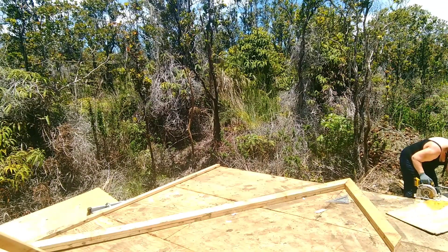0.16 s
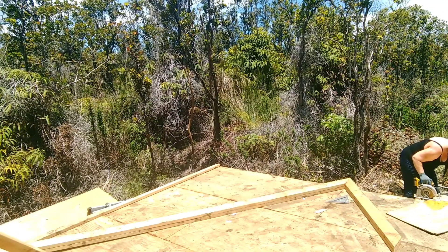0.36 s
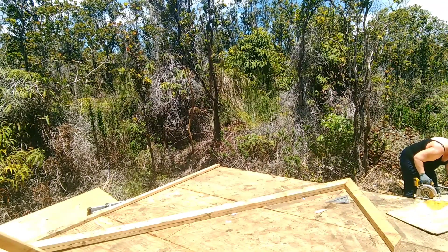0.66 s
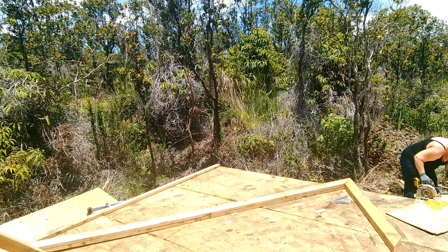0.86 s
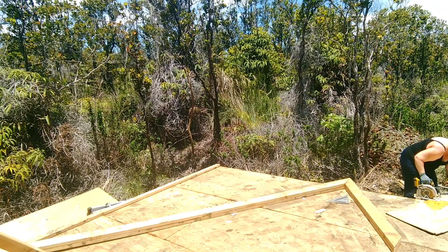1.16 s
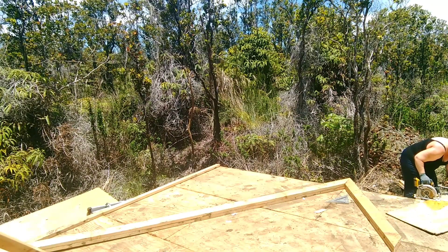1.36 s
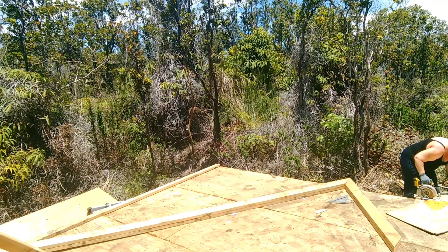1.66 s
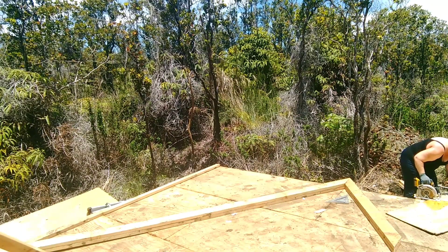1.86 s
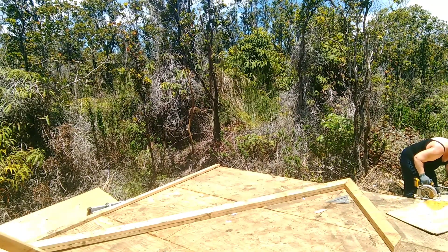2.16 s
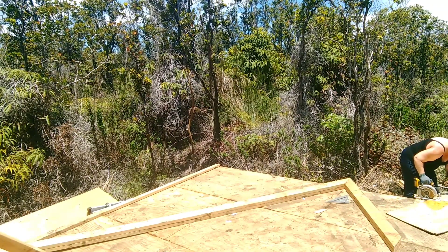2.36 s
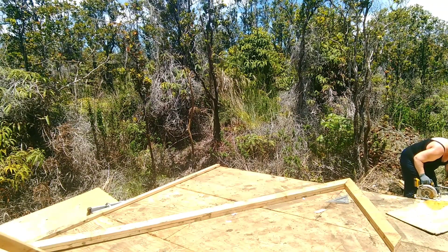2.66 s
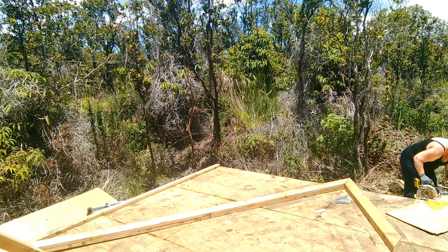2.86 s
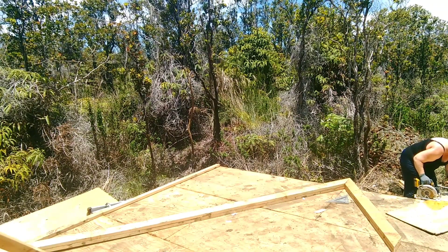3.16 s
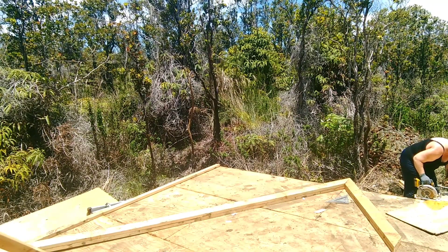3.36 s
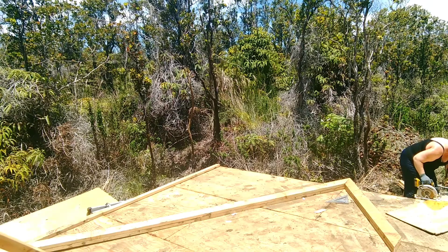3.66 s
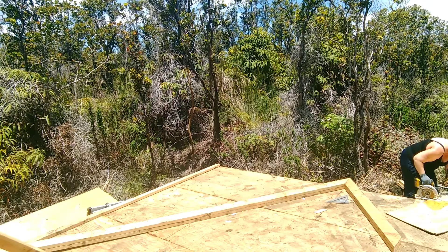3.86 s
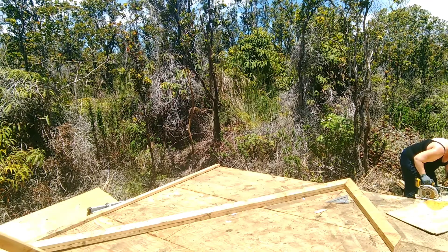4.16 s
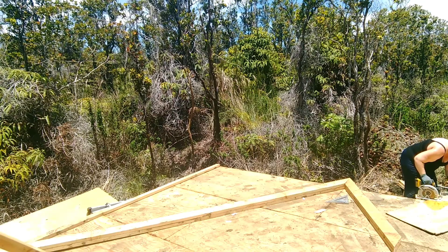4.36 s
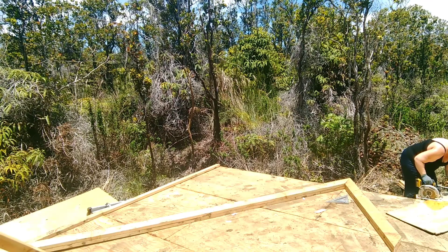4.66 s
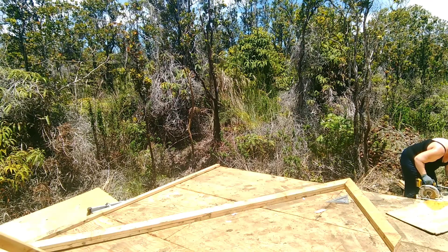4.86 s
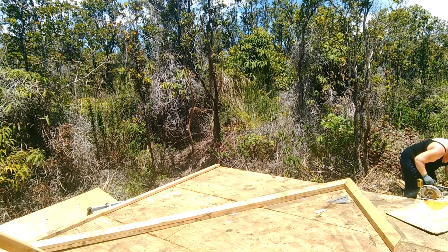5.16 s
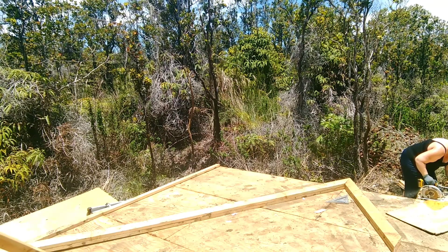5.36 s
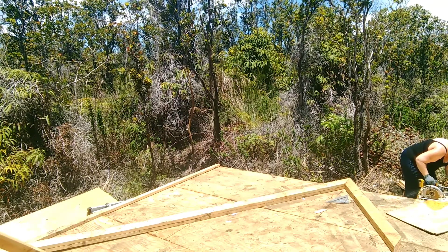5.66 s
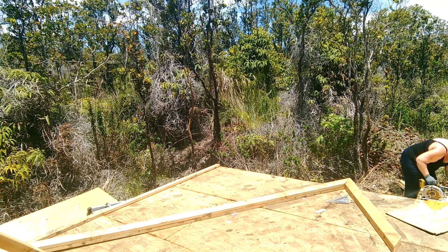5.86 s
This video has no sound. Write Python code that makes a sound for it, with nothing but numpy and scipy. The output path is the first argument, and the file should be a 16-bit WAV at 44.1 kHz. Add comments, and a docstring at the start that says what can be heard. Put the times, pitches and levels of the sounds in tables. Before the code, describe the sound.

A handheld circular saw starts with small plastic clicks and a fast rising gear whine, levels into a rushing, airy hum, then meets a plywood sheet. The cut is a harsh metallic rasp with changing squeals; from about four seconds it labours, chatters and sags unevenly. Soft gusts bump the microphones early on. Dry outdoor stereo pickup from a few metres, with faint rustling foliage behind.

```python
"""An open building deck at the edge of a wood, with a hand-held circular saw a few metres off to the right.
The trigger clicks, motor and gears whine up to speed, the blade runs free, then bites into a plywood sheet:
its rasp repeats every turn, and it rings, chatters and slows under the load. Leaves rustle and gusts thump
the microphones. Gears and motor are tones tied to one blade speed; the bites are a repeating pattern plus
noise that sets blade, guard, base plate and sheet ringing; air and wind are coloured noise."""
import sys
import numpy as np
from scipy import signal
from scipy.fft import rfft, irfft
from scipy.io import wavfile
from scipy.ndimage import uniform_filter1d

SR = 44100
rng = np.random.default_rng(int(sys.argv[2]) if len(sys.argv) > 2 else 0)


def int16_out(signal):
    """Quantize to a 16-bit WAV file."""
    q = np.round(np.clip(np.atleast_2d(signal).T, -1, 1) * 32767)
    wavfile.write(sys.argv[1], SR, q.astype(np.int16))


N = 264600  # samples, 6 s

TIME, BINS_HZ = np.arange(N) / SR, np.fft.rfftfreq(N, 1 / SR)
TEETH, PINION_TEETH, GEAR_TEETH, FAN_BLADES = 24, 9, 43, 13
MOTOR_PER_BLADE = GEAR_TEETH / PINION_TEETH  # motor turns for one turn of the blade
FREE_SPEED = 87.85  # blade turns per s


def from_db(db):
    """Turn decibels into a gain."""
    return 10 ** (np.asarray(db) / 20)


def rms_one(x):
    """Scale to an average strength (rms) of 1."""
    return x / np.sqrt(np.mean(x ** 2) + 1e-20)


def evened(x):
    """Hold the rms near 1 over every tenth of a second."""
    return x / np.sqrt(uniform_filter1d(x * x, SR // 10) + 1e-12)


def in_time(rows):
    """Draw one curve per column, with straight lines between the rows."""
    seconds, *columns = np.transpose(rows)
    return [np.interp(TIME, seconds, column) for column in columns]


def gain_at(spectrum, hz):
    """Read the gain of a spectrum, with straight lines in dB over log frequency."""
    points_hz, db = np.transpose(spectrum)
    return from_db(np.interp(np.log(hz + 1), np.log(points_hz), db))


def colour(x, spectrum):
    """Filter a signal by a spectrum and scale it to rms 1."""
    return rms_one(irfft(rfft(x) * gain_at(spectrum, BINS_HZ), N))


def drift(rate_hz, size=8192):
    """Slow random wandering with spread 1, drawn on a coarse time grid."""
    hz = np.fft.rfftfreq(size, TIME[-1] / size)
    slow = irfft(rfft(rng.standard_normal(size)) / (1 + (hz / rate_hz) ** 2), size)
    return np.interp(TIME, np.linspace(0, TIME[-1], size), rms_one(slow))


def resonate(x, modes):
    """Ring several resonances side by side, with alternating signs."""
    out = 0
    for k, (hz, width_hz, db) in enumerate(modes):
        r = np.exp(-np.pi * width_hz / SR)
        poles = [1, -2 * r * np.cos(2 * np.pi * hz / SR), r * r]
        gain = (-1) ** k * from_db(db) * (1 - r * r) / 2
        out = out + gain * signal.lfilter([1, 0, -1], poles, x + 1e-18)
    return out


def soften(x, cutoff_hz):
    """Roll off the treble gently above a frequency."""
    return signal.sosfilt(signal.butter(1, cutoff_hz, fs=SR, output="sos"), x)


def swell(top_s, rise_db_per_s, fall_db_per_s):
    """Gain that climbs to 1 and sinks again."""
    return from_db(np.minimum(rise_db_per_s * (TIME - top_s), fall_db_per_s * (top_s - TIME)))


def surges(rows):
    """Gain that swells and fades once for each row (peak_s, level_db, length_s)."""
    return sum(from_db(db) * np.exp(-(2 * (TIME - s) / length) ** 2) for s, db, length in rows)


def burst(start_s, db, attack_s, release_s):
    """Gain with a straight attack and an exponential release."""
    age = TIME - start_s
    return from_db(db) * np.clip(age / attack_s, 0, 1) * np.exp(-np.maximum(age - attack_s, 0) / release_s)


# rustle of the wood, relative: pitch_hz, level_db (dB per Hz)
FOREST_SPECTRUM = [(20, -19), (45, 1), (90, 6), (200, 3), (400, -9), (700, -5.5), (1300, -12.5),
                   (2000, -15), (4000, -20), (8000, -27.5), (15000, -32)]
# tone of wind on the microphones, relative: pitch_hz, level_db (dB per Hz)
WIND_SPECTRUM = [(18, -29), (40, -27), (65, -8), (85, -3.5), (150, -10.5), (210, -12), (300, -32.5),
                 (700, -32), (3000, -80)]
# single gusts: start_s, level_db
GUSTS = [(.755, -44), (1.257, -30), (1.541, -30), (1.64, -23), (1.698, -19), (1.808, -34), (1.964, -15),
         (2.05, -21), (2.163, -38), (2.302, -30), (2.425, -24), (2.496, -30), (2.605, -33), (2.835, -36),
         (2.933, -45)]


def outdoors(forest_db=-54, breeze_db=-29.5, unsteady_db=4.0, apart_db=-20):
    """Coloured noise: distant rustle, a breeze that swells and dies, and gusts thumping the microphones."""
    gusts = sum(burst(s, db, attack_s=.018, release_s=.022) for s, db in GUSTS)
    breeze = from_db(breeze_db + unsteady_db * drift(26))
    breeze = breeze * swell(top_s=1.85, rise_db_per_s=20, fall_db_per_s=12.5)
    forest = from_db(forest_db) * colour(rng.standard_normal((3, N)), FOREST_SPECTRUM)
    wind = np.hypot(breeze, gusts) * colour(rng.standard_normal((3, N)), WIND_SPECTRUM)
    air = forest + wind
    # one noise is shared by both sides, the other two are separate
    return microphones(air[0]) + from_db(apart_db) * air[1:]


# ringing of the switch parts, relative: pitch_hz, width_hz, level_db
TRIGGER_RING = [(1170, 250, 11.5), (2680, 500, 4.5), (4630, 290, 6), (6260, 900, -5), (10000, 3000, -13)]
# the trigger and its contacts, relative: start_s, level_db
TRIGGER_CLICKS = [(.780, -28), (0.7835, -37), (0.865, -34)]


def trigger():
    """Plastic switch parts snap against the handle: single pulses set resonances ringing."""
    clicks = np.zeros(N)
    for s, db in TRIGGER_CLICKS:
        clicks[round(s * SR)] += from_db(db)
    return from_db(12.5) * resonate(clicks, TRIGGER_RING)


def run_up(start_s=.873, run_up_s=.369, knee=4.21):
    """Share of free speed reached: the motor gains speed evenly, then rounds off."""
    age = np.maximum(TIME - start_s, 0) / run_up_s
    return age / (1 + age ** knee) ** (1 / knee)


# the blade slows where it binds in the wood: time_s, speed_turns_per_s
LOADED_SPEED = [(3.94, 87.85), (4.02, 86.9), (4.14, 83.4), (4.2, 83), (4.31, 85), (4.45, 84.85),
                (4.6, 82.95), (4.75, 82.8), (4.92, 81.2), (5.01, 80.8), (5.07, 79.45), (5.26, 77.75),
                (5.36, 76.4), (5.42, 76.4), (5.51, 78.15), (5.61, 79), (5.76, 76.5), (5.86, 76.1),
                (6, 75.2)]


def sag():
    """Turns per second lost to the wood."""
    return np.maximum(FREE_SPEED - in_time(LOADED_SPEED)[0], 0)


def binding(full_sag=1.2):
    """How tightly the cut grips the blade, 0-1; full once full_sag turns per s are lost."""
    return np.clip(sag() / full_sag, 0, 1)


def depth(enters_s=2.48, sinks_s=0.45):
    """How far the blade has sunk into the sheet, 0-1."""
    return np.clip((TIME - enters_s) / sinks_s, 0, 1)


def machine_gain(free_db, halving_db, deep_db, bound_db):
    """Level running free, fall per halving of speed, change deep in the cut, change when the blade binds."""
    return from_db(free_db + halving_db * np.log2(run_up() + 1e-9) + deep_db * depth() + bound_db * binding())


# hum of the armature, relative: multiple (of the motor speed), level_db
HUM_TONES = [(1, 2), (2, -6), (3, -18)]
# tone of the blown air, relative: pitch_hz, level_db (dB per Hz)
AIR_SPECTRUM = [(120, -3), (300, -10), (430, 2), (640, 1.5), (780, 9), (1050, -0.5), (1520, 2.5), (1850, 7),
                (2500, 5), (4500, 6), (6200, 3.5), (7200, -0.5), (11300, -5), (13000, -13), (15500, -15)]
# the rushing air wavers as the saw is brought up to the sheet: time_s, change_db
AIR_RUSH = [(1.3, -1), (1.6, .5), (1.8, -2), (1.98, 0.6), (2.01, -2), (2.17, -1.5), (2.28, 1), (2.45, 0.4),
            (2.8, -0.5), (3.2, -3)]


def motor(turns, waver=0.32, chop=0.041, fan_jitter=0.63, side_db=-6):
    """The armature hums, its fan sings and blows air, and the blade shakes the saw once a turn."""
    rush = machine_gain(free_db=-24.5, halving_db=6.5, deep_db=-3.5, bound_db=-7)
    hum = machine_gain(free_db=-46, halving_db=16, deep_db=-7, bound_db=0.5)
    fan = machine_gain(free_db=-37.5, halving_db=21, deep_db=-6, bound_db=-17)
    shake = machine_gain(free_db=-44, halving_db=20, deep_db=0, bound_db=-13)
    # the hum swells near full speed, and the fan screams a little earlier
    hum = np.hypot(hum, from_db(-39) * swell(top_s=1.307, rise_db_per_s=100, fall_db_per_s=24))
    fan = np.hypot(fan, from_db(-35) * swell(top_s=1.28, rise_db_per_s=55, fall_db_per_s=70))
    angle = 2 * np.pi * turns * MOTOR_PER_BLADE
    tones = 0
    for multiple, db in HUM_TONES:
        tones = tones + hum * from_db(db) * np.sin(round(multiple) * angle) * (1 + waver * drift(3.2))
    tones += fan * np.sin(FAN_BLADES * angle + fan_jitter * drift(30)) * (1 + waver * drift(43.0))
    # each blade turn tugs at the armature and adds a side line to the hum
    tones += hum * from_db(side_db) * depth() * (1 - binding()) * np.sin(angle + 2 * np.pi * turns)
    tones += shake * np.sin(2 * np.pi * turns)
    air = colour(rng.standard_normal(N) * (1 + chop * np.sin(angle)), AIR_SPECTRUM)
    return np.sqrt(2) * tones + rush * from_db(in_time(AIR_RUSH)[0]) * air


def whine_gain(idle_db=-39.5, run_up_db=-25, sag_db=-60, steepness=0.52):
    """Gears are loud speeding the blade up and dragging it through wood (sag_db is per turn per s lost)."""
    power = np.abs(np.gradient(run_up() ** 2))
    speeding = from_db(run_up_db) * (power / power.max()) ** steepness
    idling = from_db(idle_db) * run_up()
    dragging = from_db(sag_db) * sag()
    return np.sqrt(speeding ** 2 + idling ** 2 + dragging ** 2)


# whine of the teeth, relative: multiple (of the rate at which gear teeth meet), level_db
MESH_TONES = [(1, 5.5), (2, -1.5), (3, 1.5), (4, 0)]
# how strongly the gear case gives off sound: pitch_hz, level_db
CASE_SPECTRUM = [(300, -14), (600, -12.5), (900, -2), (1500, -2.5), (1950, -6.5), (2400, -2.5),
                 (2750, -8.5), (3100, -5.5), (3800, -16), (4500, -8), (6200, -2), (8500, -3.5),
                 (10100, -9.5), (10900, 1.5), (11800, -12), (13000, -15)]
# case resonances as the whine sweeps through, relative: pitch_hz, width_hz, level_db
FLARE_RING = [(2234, 70, 4), (2466, 22, 9), (2600, 59, -10), (2880, 100, -5)]
# when they flare: peak_s, level_db, length_s
FLARE_TIMES = [(1.142, -19.5, .065)]


def gears(speed, turns, backlash=0.67, rattle=0.47, eccentric=0.32):
    """Meshing teeth whine through the case; play blurs the tones, an off-centre pinion adds side lines."""
    whine = 0
    for multiple, db in MESH_TONES:
        k = round(multiple)
        phase = 2 * np.pi * k * GEAR_TEETH * turns + backlash * np.sqrt(k) * drift(370)
        level = from_db(db) * gain_at(CASE_SPECTRUM, k * GEAR_TEETH * speed)
        whine = whine + level * np.sin(phase) * (1 + rattle * drift(81))
    whine = whine * (1 + eccentric * np.cos(2 * np.pi * turns * MOTOR_PER_BLADE))
    flare = surges(FLARE_TIMES) * evened(resonate(rng.standard_normal(N), FLARE_RING))
    return whine_gain() * whine + flare


def turn_pattern(turns, count=200):
    """An uneven force that repeats every turn, built from count equal partials; rms 1."""
    orders = np.exp(2j * np.pi * rng.random(count))
    one_turn = rms_one(irfft(np.r_[0, orders], 20 * count))
    return np.interp(turns % 1, np.linspace(0, 1, len(one_turn)), one_turn)


# ringing of the housing, relative: pitch_hz, width_hz, level_db
HOUSING_RING = [(790, 130, 12), (1476, 370, 8.5), (2580, 370, 8.5), (3080, 47, -6), (4170, 110, -26),
                (6940, 510, -22)]


def knocking(turns, knock_db=-10, sharpness=3):
    """Under torque the pinion slaps the gear once a motor turn and rattles the housing."""
    motor_turns = turns * MOTOR_PER_BLADE
    slaps = np.exp(sharpness * np.cos(2 * np.pi * motor_turns)) * rng.standard_normal(N)
    force = rms_one(slaps) + turn_pattern(motor_turns, count=40)
    return whine_gain() * from_db(knock_db) * evened(resonate(force, HOUSING_RING))


# the blade judders when it first jams: peak_s, level_db (of the added share of uneven bites), length_s
JUDDER_TIMES = [(4.2, -11, 0.55)]


def chattering(free=0.27, bound=0.37):
    """Share of uneven bites, 0-1; it changes as the blade sinks in, binds and judders."""
    return np.clip(free * depth() + (bound - free) * binding() + surges(JUDDER_TIMES), 0, 1)


def bites(turns, runout=0.032, tooth_depth=0.69, grain_db=1.5, change=0.75, tear_hz=1300):
    """Force on the teeth: a pattern that repeats every turn, plus fibres that tear at random."""
    chatter = chattering()
    # as the saw advances, other teeth take the load and single partials swell and fade
    pattern = turn_pattern(turns) + change * sum(drift(3.8) * turn_pattern(turns) for _ in range(2))
    fibres = rng.standard_normal(N) * (1 + tooth_depth * np.cos(2 * np.pi * TEETH * turns))
    # tearing is quick, so the low partials stay clean
    fibres = rms_one(signal.sosfilt(signal.butter(1, tear_hz, "high", fs=SR, output="sos"), fibres))
    # the blade wobbles and rubs the side of the cut once a turn
    rub = (1 + runout * np.cos(2 * np.pi * turns)) * from_db(grain_db * drift(11.0))
    return rub * (np.sqrt(1 - chatter) * evened(pattern) + np.sqrt(chatter) * fibres)


# how hard the saw is pushed, as the level of its rasp: time_s, level_db
FEED_LEVEL = [(2.5, -15), (2.55, -33), (2.67, -23), (3.2, -23.5), (3.43, -27.5), (3.82, -26.5), (3.88, -23),
              (4.14, -12.5), (4.25, -25), (4.28, -27), (4.37, -18), (4.39, -25.5), (4.49, -27), (4.51, -23),
              (4.69, -38), (4.82, -25), (5.0, -20.5), (5.18, -25), (5.22, -21.5), (5.44, -22),
              (5.45, -27.5), (5.52, -22.5), (5.98, -25), (6.0, -15)]


def cut_gain(usual_db, follows, bound_db, usual_feed_db=-23):
    """Level at the usual feed, dB per dB of feed, and change when the blade binds."""
    feed_db, = in_time(FEED_LEVEL)
    return from_db(usual_db + follows * (feed_db - usual_feed_db) + bound_db * binding())


# treble in the rasp, a guide for its level: time_s, level_db
TREBLE_LEVEL = [(2.5, -28), (2.57, -16), (2.68, -29.5), (2.85, -31), (3.0, -19.5), (3.12, -22.5),
                (3.35, -32.5), (3.5, -41), (3.6, -23), (3.8, -27), (4.0, -16), (4.16, -23.5), (4.23, -32.5),
                (4.33, -22.5), (4.42, -31.5), (4.56, -15), (4.69, -35), (4.82, -25.5), (5.0, -23),
                (5.1, -22), (5.3, -26), (5.5, -26), (5.65, -23), (5.8, -25.5), (6, -23.5)]


def rasp_gain(usual_db, follows, bound_db, usual_treble_db=-27.5):
    """The direct rasp follows the level of the treble instead of the feed."""
    treble_db, = in_time(TREBLE_LEVEL)
    return from_db(usual_db + follows * (treble_db - usual_treble_db) + bound_db * binding())


# tone of tearing wood, relative: pitch_hz, level_db (dB per Hz)
RASP_SPECTRUM = [(90, -41), (250, -6), (700, -53), (1900, -11), (2500, -6), (3600, -19), (5000, 6),
                 (6200, 1), (7200, 3), (9000, 4.5), (11000, 1), (12500, -5.5), (14300, -7.5), (15200, -6)]


def rasping(force, shaving_hz=11000):
    """A free blade shaves the wood; a bound one tears it, which is brighter."""
    tearing = colour(force, RASP_SPECTRUM)
    shaving = soften(tearing, shaving_hz)
    return shaving + binding() * (tearing - shaving)


# partials that stand out while the blade cuts freely, relative: multiple (of the blade speed), level_db
FREE_PARTIALS = [(11, -52), (13, -56), (18, -46), (24, -47), (27, -40), (30, -36.5), (33, -39.5),
                 (34, -40.5), (43, -56), (44, -37.5), (47, -35), (49, -45), (51, -31), (53, -36), (54, -36),
                 (62, -31), (63, -53), (65, -46), (66, -33.5), (69, -42.5), (71, -38.5), (74, -42),
                 (75, -43), (85, -37), (92, -39), (99, -34), (101, -34), (106, -36), (108, -43)]
# partials of the bound blade, chiefly every third, relative: multiple (of the blade speed), level_db
BOUND_PARTIALS = [(9, -54.5), (10, -64), (11, -53), (12, -55.5), (15, -53), (18, -58), (20, -61),
                  (21, -60.5), (24, -58), (27, -46), (30, -39), (33, -45), (36, -40.5), (39, -43.5),
                  (42, -64), (45, -52), (48, -36), (51, -48), (54, -41.5), (55, -32), (56, -33),
                  (57, -34.5), (58, -54), (60, -31.5), (63, -49), (66, -35), (69, -32), (72, -45),
                  (75, -34.5), (78, -46), (81, -42), (96, -45)]


def singing(turns, swell_db=5.0, swell_rate_hz=3, slip=0.8):
    """Teeth of unequal set favour certain partials, which swell and fade; others take over when bound."""
    angle = 2 * np.pi * turns + slip * chattering() * drift(43) / TEETH

    def voices(partials):
        """Sum the partials, each at its own wandering level."""
        return sum(from_db(db + swell_db * drift(swell_rate_hz)) * np.sin(round(k) * angle)
                   for k, db in partials)

    free = depth() * (1 - binding()) * voices(FREE_PARTIALS)
    bound = binding() * voices(BOUND_PARTIALS)
    return np.sqrt(2) * (1 - surges(JUDDER_TIMES)) * (free + bound)


# partials that catch a resonance and squeal: peak_s, multiple (of the blade speed), level_db, length_s
SQUEAL_TIMES = [(2.608, 48, -28.5, 0.66), (2.93, 52, -33, 0.28), (3.02, 48, -26, 0.11),
                (3.125, 62, -35, 0.41), (3.16, 30, -28.5, 0.17), (3.24, 72, -27.5, 0.56),
                (3.26, 52, -26.5, 0.28), (3.246, 32, -35, 0.6), (3.255, 65, -28.5, 0.91),
                (3.3, 68, -28, 0.67), (3.43, 30, -31.5, 0.14), (3.45, 17, -30.5, 0.26),
                (3.452, 15, -36.5, 0.89), (3.655, 46, -32, 1), (3.694, 11, -39, 0.18),
                (3.85, 13, -40, 0.19), (3.909, 52, -21, 0.18), (4.017, 72, -25, 0.16), (3.7, 48, -43, .5),
                (4.02, 18, -51, 0.44), (4.11, 54, -18.5, 0.2), (4.51, 10, -38, 0.14),
                (4.503, 12, -41, 0.11), (4.294, 54, -18, 0.08), (4.346, 53, -33, 0.064),
                (4.49, 18, -31.5, 0.12), (4.521, 54, -18, 0.056), (4.527, 31, -29.5, 0.068),
                (4.83, 32, -28.5, 0.068), (4.897, 39, -37, 0.18), (4.932, 56, -27.5, 0.091),
                (5.048, 33, -26, 0.07), (5.183, 33, -31.5, 0.2), (5.268, 55, -19.5, 0.12),
                (5.332, 30, -25, 0.074), (5.383, 36, -31, 0.22), (5.475, 30, -30, 0.094),
                (5.62, 12, -41, 0.18), (5.66, 72, -26.5, 0.14), (5.68, 60, -27, 0.069),
                (5.374, 60, -27, 0.16), (5.772, 48, -36, .15), (5.96, 36, -33, 0.25)]


def squeals(turns, slip=0.34, flutter=0.086):
    """Single partials lock onto a resonance, swell and fade, gliding with the blade."""
    angle = 2 * np.pi * turns + slip * chattering() * drift(32) / TEETH
    out = 0
    for s, multiple, db, length_s in SQUEAL_TIMES:
        out = out + surges([(s, db, length_s)]) * np.cos(round(multiple) * angle)
    return np.sqrt(2) * out * (1 + flutter * drift(40))


# ringing of blade, guard, base plate and plywood sheet, relative: pitch_hz, width_hz, level_db
BLADE_RING = [(4050, 160, -7.5), (4193, 16.7, 6.5), (4548, 146, 1), (5160, 28, -28), (5494, 15, 11.5),
              (5970, 19, 7), (6255, 45, -4.5)]
GUARD_RING = [(2284, 270, 7.1), (2602, 32, 10.4), (2765, 51, 8.3), (3073, 48, 7.2)]
PLATE_RING = [(1499.6, 24, 5.8), (1542, 50, 2.7)]
SHEET_RING = [(180, 23, -3), (512, 31, 0.5), (709.2, 4.2, 11), (841, 27.5, 2), (964.5, 52, 4.5),
              (1164, 45, -3)]
# the blade guard rattles up now and then: peak_s, level_db, length_s
GUARD_RATTLE_TIMES = [(4.08, -28, 0.07), (4.37, -28, 0.16), (4.54, -27.5, 0.15)]
# the sheet drums when teeth first catch and when it lifts against the blade: peak_s, level_db, length_s
SHEET_DRUM_TIMES = [(2.56, -30, 0.034), (2.84, -41, 0.16), (3.72, -38.5, 0.54), (4.12, -40, 0.048),
                    (4.31, -40, 0.09), (4.52, -39.5, 0.09), (5.02, -39, 0.43), (5.61, -39, 0.24)]
# a narrow resonance of the sheet howls during the judder: pitch_hz, width_hz, level_db (relative)
HOWL_RING = [(1146, 2.2, 0)]
# when it howls: peak_s, level_db, length_s
HOWL_TIMES = [(4.2, -39, 0.42)]
# lowest resonance of the plywood sheet, relative: pitch_hz, width_hz, level_db
SHEET_DRONE_RING = [(161, 8, -45)]


def cutting(turns, ring_top_hz=6640):
    """The bites are heard directly and set blade, guard, base plate and plywood sheet ringing."""
    force = bites(turns)
    contact, = in_time([(2.48, 0.00083), (2.55, 0.87)])
    out = rasp_gain(usual_db=-25.5, follows=0.47, bound_db=0.22) * rasping(force)
    out += cut_gain(usual_db=-1.64, follows=0.75, bound_db=0) * singing(turns)
    out += squeals(turns)
    # the ringing parts take up little of the highest treble
    force = signal.sosfilt(signal.butter(2, ring_top_hz, fs=SR, output="sos"), force)
    blade = cut_gain(usual_db=-26.5, follows=0.44, bound_db=2.3)
    guard = np.hypot(cut_gain(usual_db=-33.5, follows=0.6, bound_db=1), surges(GUARD_RATTLE_TIMES))
    # the base plate buzzes most as it slides onto the sheet, then settles
    plate = cut_gain(usual_db=-30, follows=0.48, bound_db=0.63)
    plate = plate * swell(top_s=3.26, rise_db_per_s=23, fall_db_per_s=6.3)
    sheet = cut_gain(usual_db=-46, follows=0.25, bound_db=-2.6) * depth()
    sheet = np.hypot(sheet, surges(SHEET_DRUM_TIMES))
    out += blade * evened(resonate(force, BLADE_RING))
    out += guard * evened(resonate(force, GUARD_RING))
    out += plate * evened(resonate(force, PLATE_RING))
    out += sheet * evened(resonate(force, SHEET_RING))
    out += surges(HOWL_TIMES) * evened(resonate(rng.standard_normal(N), HOWL_RING))
    # a bound blade flexes twice a turn and drones where that meets the lowest resonance of the sheet
    out += resonate(binding() * np.sin(4 * np.pi * turns), SHEET_DRONE_RING)
    return contact * out


# the left microphone is slightly shaded: pitch_hz, level_db
LEFT_SHADE_SPECTRUM = [(300, -0.5), (600, -2.5), (1400, -3), (1850, 0)]
# phase of the left microphone against the right one: pitch_hz, phase_rad
LEFT_PHASE = [(0, -3.14), (250, -2.7), (350, -1.3), (550, -.9), (1000, -.5), (1400, -1.4), (1650, -2.2),
              (1900, -3.14), (3550, -9.42), (5340, -15.71), (7170, -21.99), (8930, -28.27), (14220, -47.12),
              (22050, -74.9)]


def microphones(x):
    """The left side hears the saw later; in the bass the two sides move against each other."""
    hz = np.fft.rfftfreq(2 * N, 1 / SR)
    phase = np.interp(hz, *np.transpose(LEFT_PHASE))
    left = gain_at(LEFT_SHADE_SPECTRUM, hz) * np.exp(1j * phase)
    return np.array([irfft(rfft(x, 2 * N) * left)[:N], x])


def scatter(x, t60_s=0.068, dull_hz=12000, flutter_rate_hz=25):
    """A short, fluttering tail follows the saw, partly alike and partly opposed on the two sides."""
    age = TIME[:SR // 2]
    tail = rng.standard_normal((2, len(age))) * from_db(-60 * age / t60_s)
    tail = soften(tail, dull_hz)
    tail /= np.sqrt(np.sum(tail ** 2, axis=1, keepdims=True))
    echoes = signal.fftconvolve(x[None], tail, axes=1)[:, :N]
    alike, opposed = (microphones(echo * drift(flutter_rate_hz)) for echo in echoes)
    # [::-1] swaps left and right
    return (alike + alike[::-1] + opposed - opposed[::-1]) / 2


def scene(scatter_db=-14):
    """One blade speed drives motor, gears and cut."""
    speed = FREE_SPEED * run_up() - sag()
    turns = np.cumsum(speed) / SR
    machine = (speed > 0) * (motor(turns) + gears(speed, turns) + knocking(turns))
    saw = trigger() + machine + cutting(turns)
    return outdoors() + microphones(saw) + from_db(scatter_db) * scatter(saw)


def record(dry, cutoff_hz=15500):
    """The highest treble is cut off steeply."""
    return signal.sosfilt(signal.ellip(10, .2, 80, cutoff_hz, fs=SR, output="sos"), dry)


dry = scene()
out = record(dry)
int16_out(out)
```